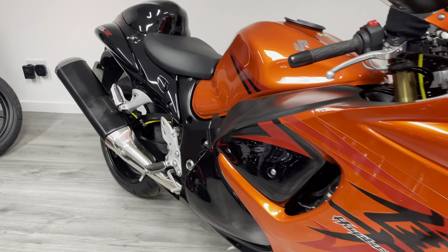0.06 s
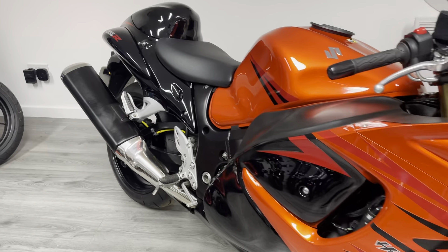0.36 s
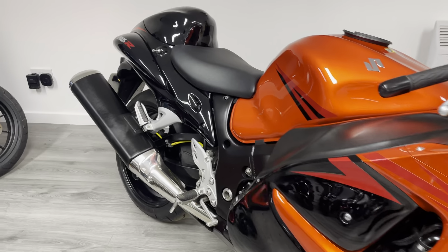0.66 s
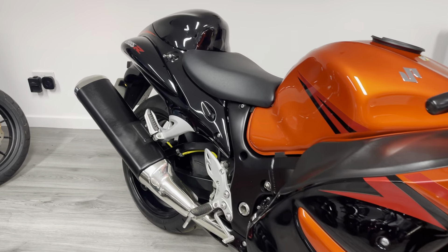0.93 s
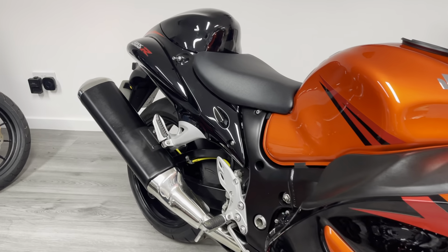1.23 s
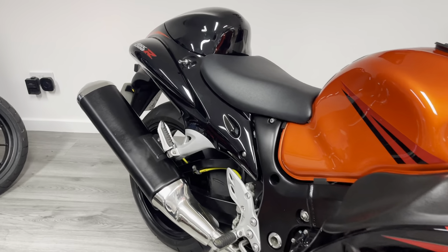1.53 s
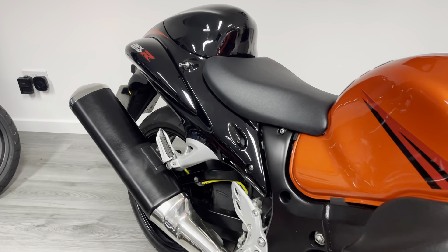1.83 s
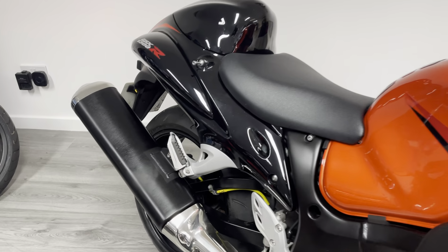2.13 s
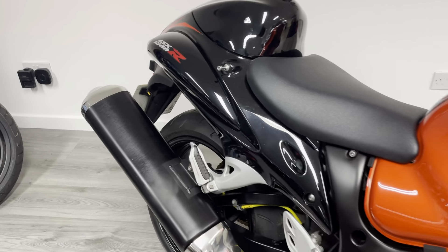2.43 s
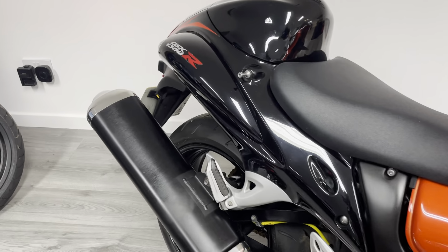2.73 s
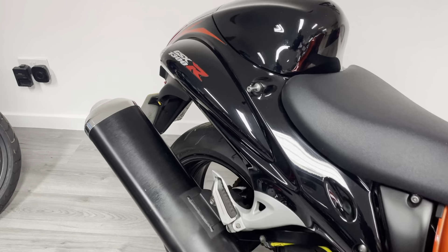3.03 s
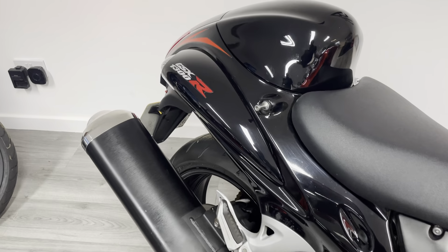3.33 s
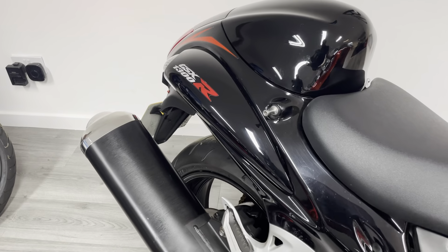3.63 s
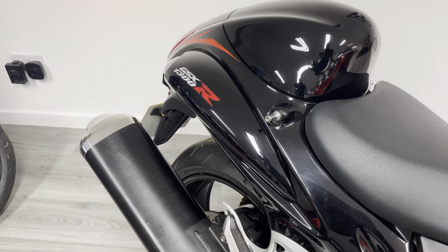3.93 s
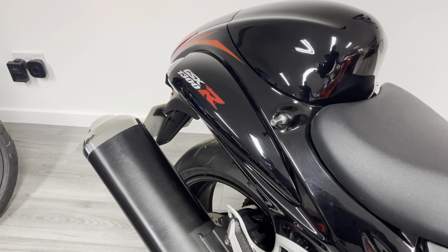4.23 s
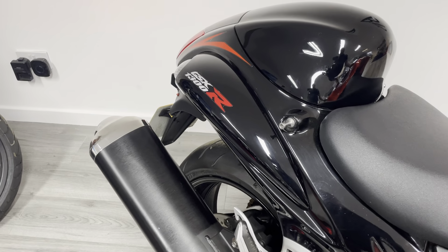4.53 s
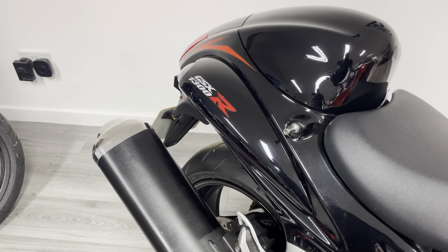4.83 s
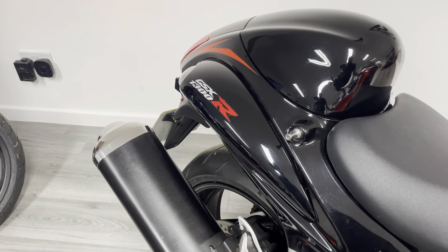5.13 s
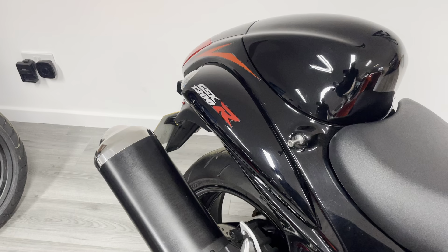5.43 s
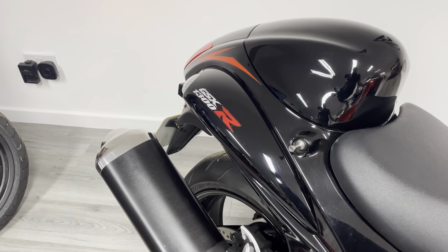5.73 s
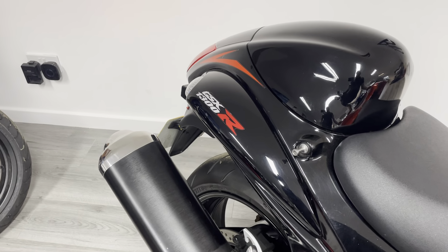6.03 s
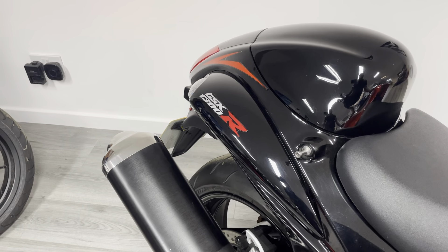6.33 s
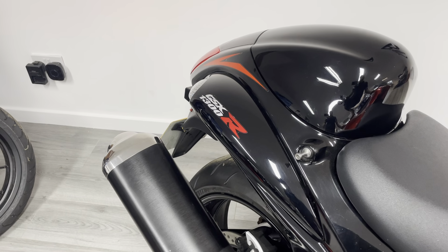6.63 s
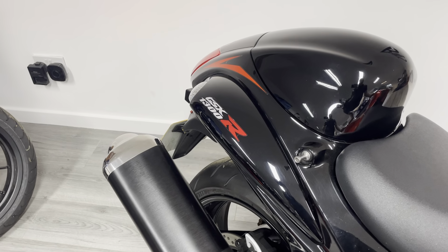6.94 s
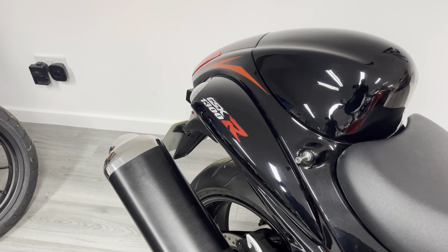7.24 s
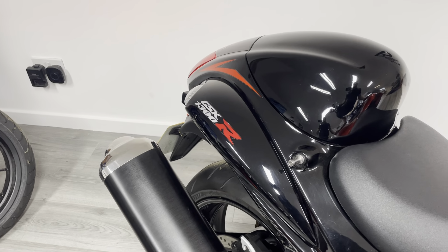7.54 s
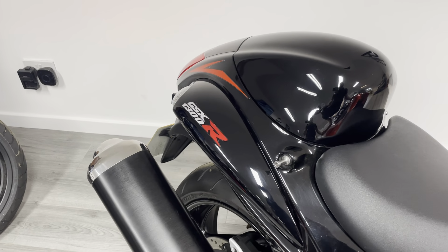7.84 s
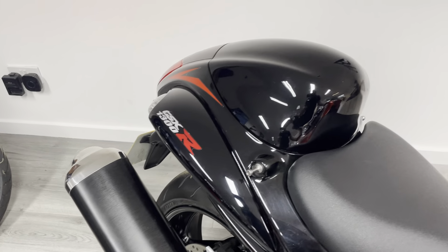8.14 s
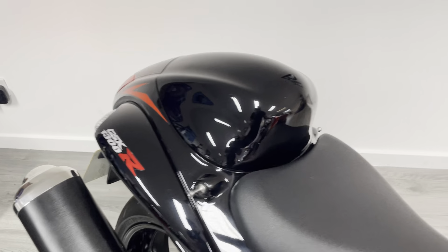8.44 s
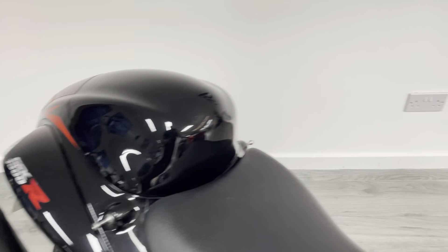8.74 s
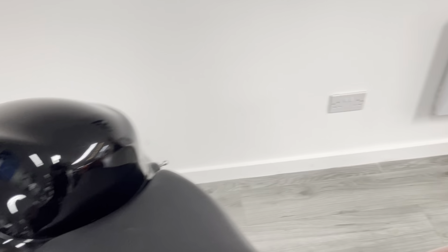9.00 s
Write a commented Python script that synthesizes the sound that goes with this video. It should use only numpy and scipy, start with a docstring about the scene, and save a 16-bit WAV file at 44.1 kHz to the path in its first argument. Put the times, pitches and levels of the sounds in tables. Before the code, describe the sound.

An inline-four motorcycle idles indoors with a deep, steady note, soft exhaust puffs and light valve clatter. The throttle is then blipped eight times in quick succession, the first ones climbing higher each time, the second catching with a sharp cough. Each rev growls and hisses before dropping back. The engine settles to a slightly faster idle. The small hard-walled room booms and rings around a microphone near the tail.

```python
"""In a small hard-walled showroom an inline-four motorcycle idles, is blipped eight times and settles to
a faster idle. Each firing drives a deep note and a puff of gas from the silencer; valves clatter and the
outlet jet hisses under throttle. The second blip catches with a sharp cough; it and the third thump
in the pipe. The room's standing waves boom and ring around a phone held near the tail."""
import sys
import numpy as np
from scipy import signal
from scipy.fft import rfft, irfft, next_fast_len
from scipy.io import wavfile
from scipy.ndimage import uniform_filter1d

SR = 44100
rng = np.random.default_rng(int(sys.argv[2]) if len(sys.argv) > 2 else 0)


def master(y):
    """Save y as 16-bit WAV."""
    cut = np.clip(np.atleast_2d(y).T, -1, 1)
    pcm = np.round(cut * 32767)  # scale
    wavfile.write(sys.argv[1], SR, pcm.astype(np.int16))


N = 408807
T = np.arange(N) / SR

# Throttle blips. Each row: start in seconds, run-up in seconds, top firing rate in Hz, coasting time
# in seconds, extra gas in dB, extra clatter in dB, room boom in dB.
BLIPS = [(3.696, 0.15, 83.64, 0.28, 8, 9, -14), (4.181, .190, 122.9, 0.19, 9, 7.5, -22.5),
         (4.613, 0.2, 157.1, 0.22, 10.5, 2.5, -28), (5.074, 0.22, 172.5, 0.25, 9.5, 2.5, -29),
         (5.610, 0.21, 182.5, 0.28, 11, 4.5, -26.5), (6.201, .190, 173.7, .260, 10, 3.5, -30),
         (6.727, .220, 177.7, 0.26, 10.5, 1, -30), (7.317, 0.25, 177.9, .270, 11.5, 2, -29)]


def undb(db):
    """Decibels to amplitude ratio."""
    return 10 ** (np.asarray(db) / 20)


def unit(x):
    """Normalisation to rms 1."""
    return x / np.sqrt(np.mean(x ** 2))


def curves(table):
    """Linear interpolation of each column of a time table, sample by sample."""
    seconds, *columns = np.transpose(table)
    return [np.interp(T, seconds, column) for column in columns]


def gains(points, size):
    """Magnitude response at each FFT bin, through points of frequency in Hz and gain in dB."""
    hz, db = np.transpose(points)
    return undb(np.interp(np.log(np.fft.rfftfreq(size, 1 / SR) + 1), np.log(hz), db))


def colour(x, points, size=4096):
    """Minimum-phase filter through points of frequency in Hz and gain in dB."""
    cepstrum = irfft(np.log(gains(points, size)))
    cepstrum[1:size // 2] *= 2
    cepstrum[size // 2 + 1:] = 0
    return signal.oaconvolve(x, irfft(np.exp(rfft(cepstrum))))[:N]


def ring(x, hz, width_hz):
    """Second-order resonance with gain 1 at its centre."""
    return signal.lfilter(*signal.iirpeak(hz, hz / width_hz, fs=SR), x)


def ring_twice(x, hz, stage_width_hz):
    """Two equal resonances in cascade: a narrower peak with steeper skirts."""
    return ring(ring(x, hz, stage_width_hz), hz, stage_width_hz)


def wander(rate_hz):
    """Smooth random modulation of rms 1."""
    knots = rng.standard_normal(4096)
    return unit(uniform_filter1d(np.interp(T * rate_hz, np.arange(len(knots)), knots), size=200))


def wavering(phase, orders, rate_hz, waver):
    """Partials locked to the crank, each randomly modulated in amplitude and phase."""
    partials = 0
    for order, db in orders:
        amplitude = undb(db) * (1 + waver * wander(rate_hz))
        angle = 2 * np.pi * (order * phase + rng.random()) + waver * wander(rate_hz)
        partials += amplitude * np.sin(angle)
    return np.sqrt(2) * partials


def strokes(phase, pattern_db, scatter_db, jitter):
    """Impulse train, one pulse a cycle, in a repeating pattern with random scatter of size and timing."""
    cycles = np.arange(1, int(phase[-1]))
    early_late, strong_weak = rng.standard_normal((8192, 2))[cycles].T
    onsets = np.interp(cycles + jitter * early_late, phase, np.arange(N)).astype(int)
    sizes = undb(np.take(pattern_db, cycles, mode="wrap") + scatter_db * strong_weak)
    return np.bincount(onsets, sizes, N)


def burst(pulses, decay_s):
    """Noise whose energy jumps at each pulse and decays exponentially."""
    energy = signal.lfilter([1], [1, -np.exp(-2 / (decay_s * SR))], pulses ** 2)
    return unit(np.sqrt(energy) * rng.standard_normal(N))


def room(x, wet_db, absorb_hz=5000, t60_s=0.44):
    """Reverberation: direct sound plus reflections, unlike at each microphone; walls absorb treble."""
    t = T[:SR // 2]
    absorption = signal.butter(3, absorb_hz, fs=SR, output="sos")
    noise = signal.sosfilt(absorption, rng.standard_normal((2, len(t))))
    decay = 1000 ** (-t / t60_s) * (t > .003)
    tail = noise * decay / np.sqrt(np.sum(decay ** 2))
    reflections = signal.oaconvolve(x[None], tail, axes=1)[:, :N]
    wet = undb(wet_db)
    return (x + wet * reflections) / np.sqrt(1 + wet ** 2 / 2)


def engine_speed(run_up_power=1.12, coast_power=1.87):
    """Firing rate in Hz, two firings a turn: each blip accelerates the crank and friction slows it."""
    # The idle sags once and is faster after the revs. Each row: time in seconds, firing rate in Hz.
    idle_rates = [(0, 48.5), (.3, 48.28), (.6, 42.98), (.8, 46), (1.1, 46.88), (1.7, 46.08), (2.3, 46.32),
                  (3, 47.5), (3.4, 45.32), (3.68, 45.07), (8.3, 57.73), (8.7, 60.22), (9.1, 59.93),
                  (9.27, 57.6)]
    idle, = curves(idle_rates)
    hz = idle
    for start, run_up, top_hz, coast, *_ in BLIPS:
        caught = np.sin(np.pi / 2 * np.clip((T - start) / run_up, 0, 1)) ** run_up_power
        coasting = np.exp(-(np.maximum(T - start - run_up, 0) / coast) ** coast_power)
        hz = hz + caught * (idle + (top_hz - idle) * coasting - hz)
    return hz


def throttle(sizes, attack_s, hold, release_s, lead_s=.025):
    """Envelope of the blips: each opens ahead of the crank, holds for a share of the run-up, decays."""
    swells = 0
    for size, (start, run_up, *_) in zip(sizes, BLIPS):
        opening = np.clip((T - start + lead_s) / attack_s, 0, 1)
        closing = np.exp(-np.maximum(T - start - hold * run_up, 0) / release_s)
        swells += size * opening * closing
    return swells


def exhaust_note(phase, hz, note_db):
    """Forced oscillation: firings drive a deep tone; room modes linger and beat with it as it glides."""
    # The room's response, with a node near 125 Hz. Each row: firing rate in Hz, gain in dB.
    note_response = [(43, -19.5), (47, -12.5), (59, -15.5), (75, -12), (100, -17.5), (125, -23.5),
                     (150, -8), (180, -7)]
    # Overtones at idle. Each row: multiple of the firing rate, level in dB.
    overtone_orders = [(1.5, -21), (2, -8.5), (3, -20.5), (3.5, -21.5), (4, -25.5), (5, -23), (6, -25),
                       (7, -32.5), (10, -25.5), (14, -28.5)]
    # Overtones swell as the idle sags and weaken at speed. Each row: firing rate in Hz, gain in dB.
    overtone_fade = [(43, 7.5), (46, -1.5), (48, -2.5), (59, -6.5), (80, -11.5), (110, -16), (175, -37)]
    # Standing waves. Each row: frequency in Hz, width in Hz, gain at the phone (negative in antiphase).
    room_modes = [(68.62, 1.45, 2), (74.5, .8, -0.3), (149.5, 1.8, 0.1), (156.7, 17, -0.41),
                  (176.7, 3.1, -0.56)]
    level_db = note_db + np.interp(hz, *np.transpose(note_response))
    tone = np.sqrt(2) * undb(level_db + .5 * wander(28) + 0.36 * wander(5)) * np.sin(2 * np.pi * phase)
    overtones = wavering(phase, overtone_orders, rate_hz=9, waver=0.29)
    overtones *= undb(level_db + np.interp(hz, *np.transpose(overtone_fade)))
    overtones -= 0.98 * ring(overtones, 114.9, 28)  # a node of the room cancels a narrow band
    return tone + overtones + sum(gain * ring(tone, f, width) for f, width, gain in room_modes)


def exhaust_puffs(phase, hz, firings, puff_db):
    """Pulse excitation: each firing expels gas; strong, fast pulses steepen, ring the pipe and growl."""
    # Spectrum of the silencer's soft puffs. Each row: frequency in Hz, gain in dB.
    puff_colour = [(60, -32), (120, -0.5), (170, 1.5), (235, 3), (300, 1), (365, -1), (450, 0), (650, -6.5),
                   (1000, -13), (1500, -16), (3000, -51), (9000, -72)]
    # Pipe resonances. Each row: frequency in Hz, half-width of one filter stage in Hz, gain in dB.
    pipe_modes = [(370, 17, -13), (424, 20, 0), (510.1, 22, 5.5), (673, 46, -3), (858, 130, 2.5),
                  (1025, 150, 1.5), (1232, 155, -4.5), (1780, 160, -12)]
    # Orders that growl under load. Each row: multiple of the firing rate, level in dB.
    growl_orders = [(3, -0.5), (3.5, -5), (4, -6), (6, -2), (6.5, -6), (7, -6), (7.5, -4), (8, -16)]
    soft = unit(colour(firings + burst(firings, decay_s=0.04), puff_colour))
    drive = firings + burst(firings, decay_s=0.0059)
    rasp = unit(sum(undb(db) * ring_twice(drive, f, 2 * half) for f, half, db in pipe_modes))
    growl_gain = undb(-4.5) * np.clip((hz - 68) / 85, 0, 1)
    growl = growl_gain * wavering(phase, growl_orders, rate_hz=80, waver=0.77)
    excess_db = puff_db + 0.1 * hz + 19  # level and speed together harden the puffs
    hard_share = 1 / (2.5 + np.exp(-excess_db / 2.5))
    hard = undb(-1.5) * room(rasp, wet_db=5.7) + room(growl, wet_db=0.78)
    soft = undb(1.5) * room(soft, wet_db=0)
    return undb(puff_db) * (np.sqrt(1 - hard_share) * soft + np.sqrt(hard_share) * hard)


def valve_clatter(phase, hz, clatter_db):
    """Impact noise: valves seat eight times in two crank turns, over cam chain rush and gear whine."""
    # Response of the engine cases. Each row: frequency in Hz, gain in dB.
    case_colour = [(150, -32), (500, -1.5), (720, -5), (850, 1), (1170, -4), (1530, 2), (1850, 2),
                   (2350, 3), (2700, -4.5), (4000, -10), (5200, -7.5), (6500, -19.5), (9500, -25),
                   (11000, -29)]
    # Gear mesh tones. Each row: multiple of the firing rate, level in dB ahead of the cover.
    whine_orders = [(15.5, -14), (16, -9.5)]
    # Transmission through the clutch cover. Each row: frequency in Hz, gain in dB.
    cover = [(800, -5), (1500, -8.5), (2300, 3), (2600, -7), (3000, -29)]
    valve_db = [0.5, 1.0, 2.5, 0.5, 1.5, -3.5, -0.5, 1.0]
    ticks = unit(strokes(2 * phase, valve_db, scatter_db=2.0, jitter=.14) / np.sqrt(hz))
    impacts = undb(-8) * ticks + undb(2) * ring(ticks, hz=1570, width_hz=170) + burst(ticks, 0.012)
    chain = rng.standard_normal(N)
    whine = np.clip(hz / 90, 0, 1) ** 2 * wavering(phase, whine_orders, rate_hz=32, waver=0.74)
    cases = room(unit(colour(impacts + chain, case_colour)), wet_db=0.22)
    gears = room(colour(whine, cover), wet_db=-2)
    return undb(clatter_db + 1) * (cases + gears)


def gas_jet(firings, jet_db):
    """Jet noise: gas hisses at the outlet, amplitude-modulated by the firings."""
    # Spectrum of the jet. Each row: frequency in Hz, gain in dB.
    jet_colour = [(500, -19.5), (2500, 9.5), (3300, 8), (5000, 0), (6500, 2), (8300, 0), (9800, 3.5),
                  (11500, -3.5), (13500, -6.5), (15500, -14)]
    hiss = burst(firings, decay_s=0.025) + undb(-2) * rng.standard_normal(N)
    return undb(jet_db + 7) * room(unit(colour(hiss, jet_colour)), wet_db=-6)


def room_boom(strength):
    """Random excitation of a resonance: unequal firings, taken as noise, shake up a low room boom."""
    boom = unit(ring_twice(rng.standard_normal(N), hz=65.1, stage_width_hz=29))
    # the shaking is dense, so the boom flutters without long lulls
    return strength * boom / np.sqrt(uniform_filter1d(boom ** 2, size=SR // 8) + 0.061)


def coughs():
    """Broadband transients: sharp bursts of gas as the throttle snaps open and the engine catches."""
    # Gas bursts. Each row: start in seconds, level in dB, decay time in seconds.
    bursts = [(4.183, -5, 0.0066), (4.202, -6.5, 0.0063), (4.226, -24, .007)]
    # Their spectrum. Each row: frequency in Hz, gain in dB.
    cough_colour = [(80, 8), (200, 7), (400, -2), (900, -3), (2300, 0), (3300, -12), (5500, -9),
                    (8000, -27), (14000, -33)]
    envelope = sum(undb(db) * (T >= s) * np.exp(-np.abs(T - s) / decay) for s, db, decay in bursts)
    return room(envelope * unit(colour(rng.standard_normal(N), cough_colour)), wet_db=0.9)


def pipe_thumps(hz=452, stage_width_hz=160, decay_s=0.025):
    """Damped resonance: the pipe gives a short hollow bark after a hard firing."""
    # Hard firings early in a run-up. Each row: start in seconds, level in dB.
    hard_firings = [(4.272, -12.5), (4.681, -13)]
    envelope = sum(undb(db) * (T >= s) * np.exp(-np.abs(T - s) / decay_s) for s, db in hard_firings)
    gas = rng.standard_normal(N)
    return ring_twice(envelope * gas, hz, stage_width_hz) / np.std(ring_twice(gas, hz, stage_width_hz))


def scene():
    """Superposition: one crankshaft times the engine's layers, whose levels follow speed and throttle."""
    # Base levels, which sink over the revs. Each row: time in seconds, then note, puffs, clatter
    # and jet in dB.
    base_levels = [(0, -1, -28, -32.5, -47), (.9, 0, -28, -32.5, -45), (3.6, 0.5, -27.5, -32.5, -46.5),
                   (4.6, -2, -29.8, -34.8, -53), (5.4, -3, -31.5, -37, -54.3), (7.3, -4, -33, -38.5, -57),
                   (8.1, -3.5, -35.5, -40.5, -57), (8.6, -0.5, -33.5, -39.5, -56.5)]
    note_db, puff_db, clatter_db, jet_db = curves(base_levels)
    *_, gas_db, rattle_db, boom_db = np.transpose(BLIPS)
    hz = engine_speed()
    octaves = np.log2(hz / 46)  # the factors on this are in dB per octave of speed
    note_db += throttle([4] * len(BLIPS), attack_s=0.078, hold=.8, release_s=0.21)
    puff_db += 2 * octaves + throttle(gas_db, attack_s=.065, hold=0.83, release_s=0.11)
    clatter_db += 6 * octaves + throttle(rattle_db, attack_s=0.018, hold=0.086, release_s=0.12)
    jet_db += 7.5 * octaves + 0.93 * throttle(gas_db, attack_s=0.056, hold=0.64, release_s=0.14)
    boom = room_boom(undb(-35) + throttle(undb(boom_db), attack_s=.12, hold=1.0, release_s=0.4))
    phase = np.cumsum(hz) / SR + .01 * wander(rate_hz=16)  # in firings; the crank runs early and late
    cylinder_db = [0.072, -0.21, 0.89, -1.1]
    firings = unit(strokes(phase, cylinder_db, scatter_db=2.25, jitter=0.021) / np.sqrt(hz))
    exhaust = exhaust_note(phase, hz, note_db) + exhaust_puffs(phase, hz, firings, puff_db)
    clatter = valve_clatter(phase, hz, clatter_db)
    return exhaust + boom + clatter + gas_jet(firings, jet_db) + coughs() + pipe_thumps()


def record(dry, top_hz=14300):
    """Transduction: two microphone ports resonate differently; the phone rounds peaks and cuts the top."""
    # The left microphone is the brighter. Each row: frequency in Hz, left minus right in dB.
    balance = [(50, -.3), (110, 0), (170, -1.6), (400, -.3), (1000, -.6), (2200, 1.3), (4100, 4),
               (7500, .5), (10000, 0)]
    # Phase between the ports. Each row: frequency in Hz, lead of the left in radians.
    port_phase = [(0, 0), (250, -.1), (650, -.6), (1100, -.2), (1550, -.6), (2800, .2), (5000, .5),
                  (6000, 0), (6900, -1.3), (8150, -3.14), (10000, -4.8), (11700, -6.28), (13300, -7.85),
                  (14900, -9.42)]
    size = next_fast_len(N)
    lead = np.interp(np.fft.rfftfreq(size, 1 / SR), *np.transpose(port_phase))
    port = np.sqrt(gains(balance, size)) * np.exp(.5j * lead)
    heard = irfft(rfft(dry, size) * np.array([port, 1 / port]), size)[:, :N]
    rounded = heard / (1 + heard ** 8) ** (1 / 8)
    return signal.sosfilt(signal.ellip(10, .2, 80, top_hz, fs=SR, output="sos"), rounded)


dry = scene()
out = record(dry)
master(out)
```